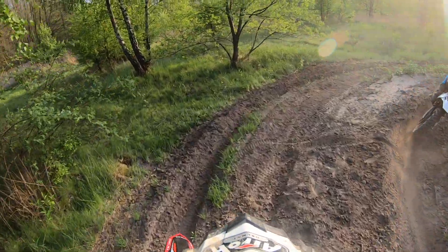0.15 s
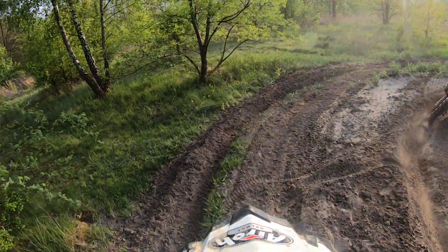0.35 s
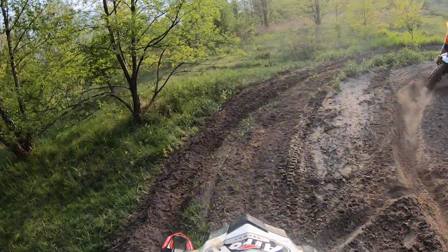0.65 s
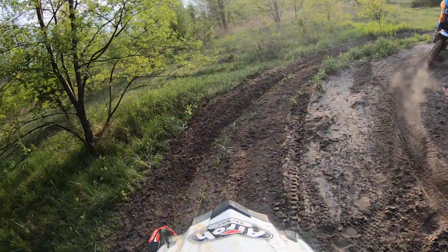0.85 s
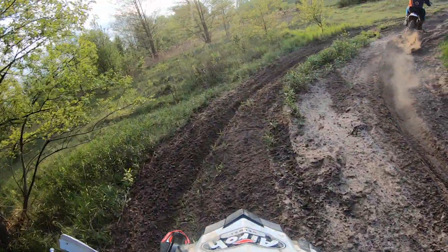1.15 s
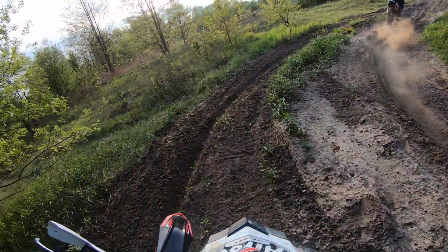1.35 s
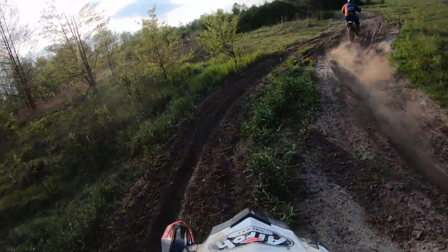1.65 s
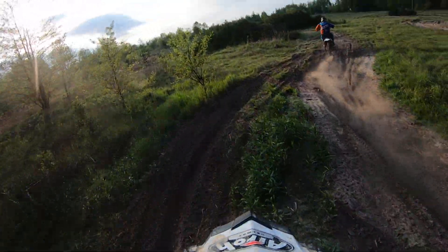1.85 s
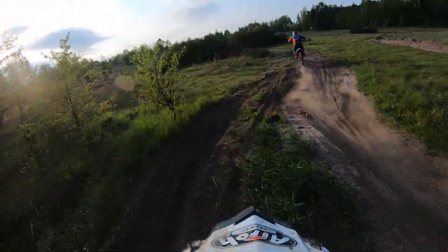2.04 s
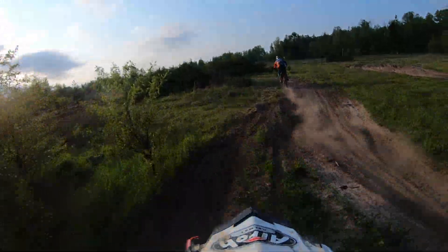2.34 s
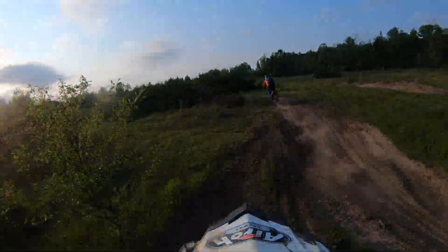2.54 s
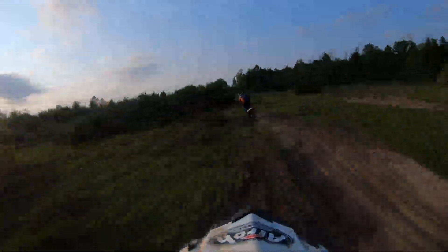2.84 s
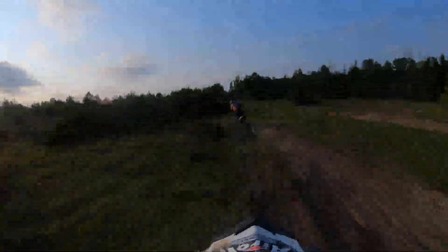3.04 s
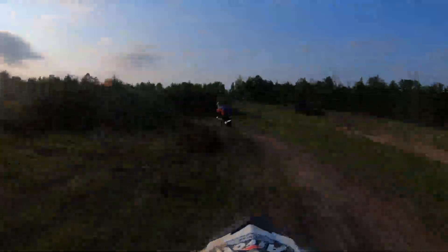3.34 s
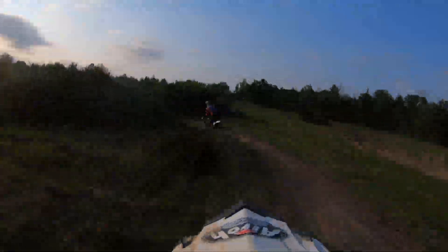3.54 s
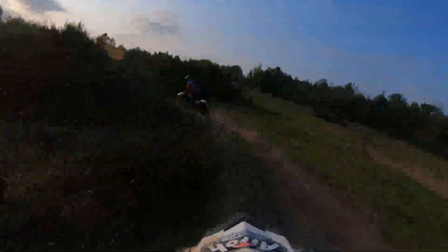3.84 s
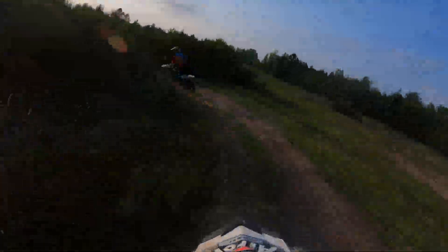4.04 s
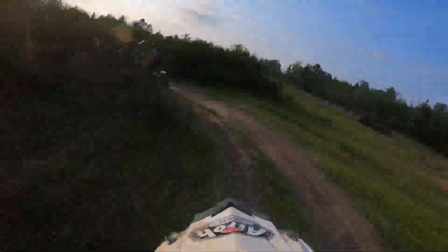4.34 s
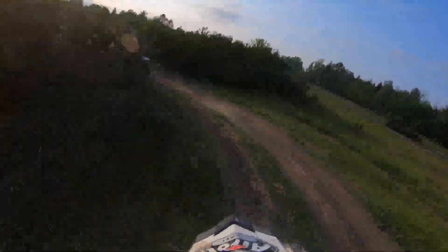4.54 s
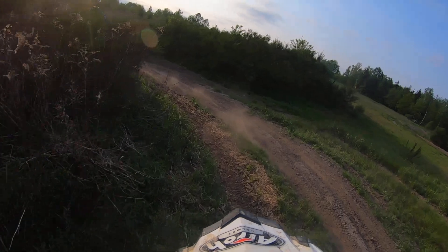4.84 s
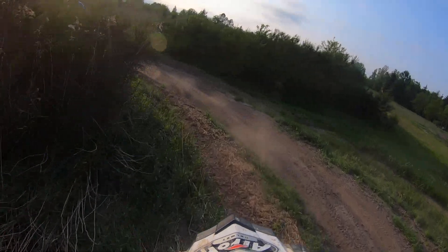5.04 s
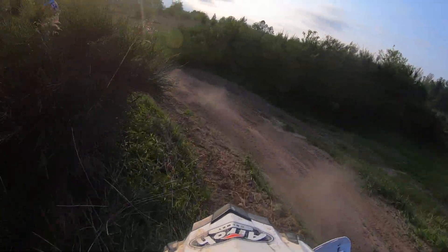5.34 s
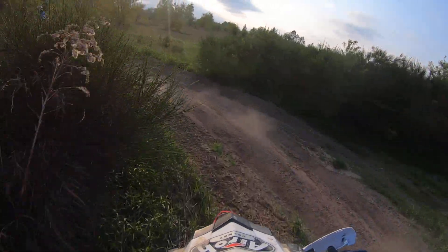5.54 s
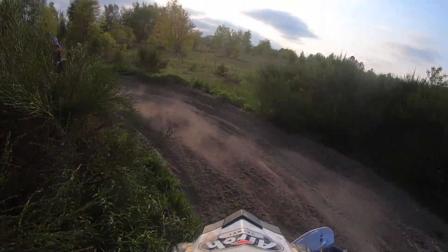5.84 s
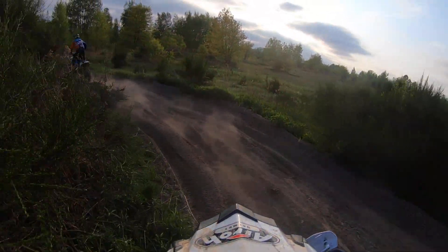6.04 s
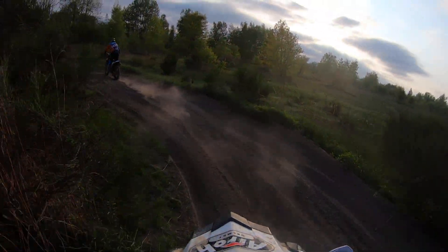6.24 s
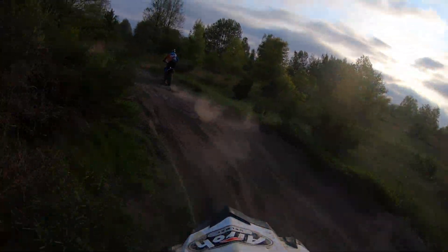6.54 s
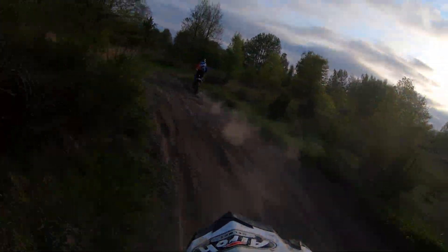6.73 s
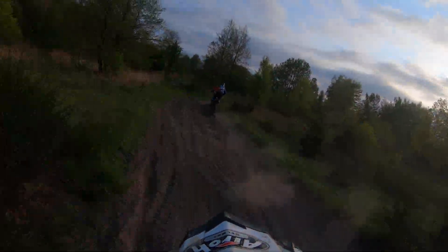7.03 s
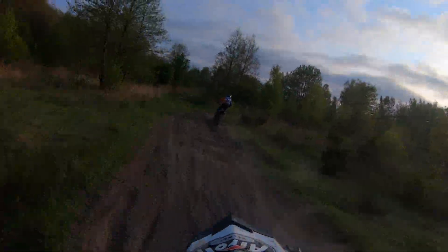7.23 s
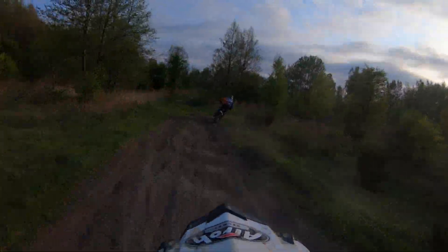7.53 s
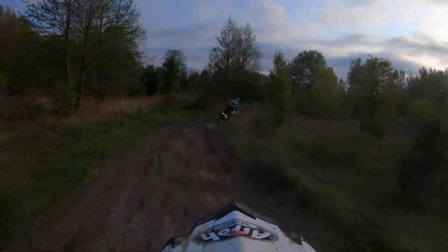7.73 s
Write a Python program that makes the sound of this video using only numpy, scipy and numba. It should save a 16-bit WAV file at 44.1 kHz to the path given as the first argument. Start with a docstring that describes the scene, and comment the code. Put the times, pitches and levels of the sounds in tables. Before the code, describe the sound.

Onboard off-road motorcycle blares in uneven throttle pulls behind another thumping bike, goes quiet with knocks and rattling stones, then buzzes raggedly onward.

```python
"""Two-stroke enduro on dirt

Heard at the rider's helmet: engine firings ring airbox and pipe in loud spells, with a quiet stretch midway.
A bike ahead thumps and cracks through its silencer early on; pops ring in the rider's own pipe.
Modal knocks sound the chassis; stones, swishes and a grainy tyre hiss are coloured noise.
Behind lie a one-band chain whirr and wind: lumpy rumble, rush and gusts.
"""
import sys
import numpy as np
from scipy import signal
from scipy.io import wavfile
from scipy.ndimage import uniform_filter1d
from numba import njit

SR = 44100
rng = np.random.default_rng(int(sys.argv[2]) if len(sys.argv) > 2 else 0)


def persist_wave(psi):
    """Save psi, clipped to +-1, as 16-bit WAV."""
    counts = np.round(np.clip(psi, -1, 1) * 32767).astype(np.int16)
    wavfile.write(sys.argv[1], SR, np.atleast_2d(counts).T)


N = 347508

# engine speed: t/s, firing rate/Hz
SPEED = [(0, 38), (.35, 36.5), (.42, 46), (.53, 50), (.6, 43), (.68, 37.5), (.78, 40.5), (.92, 47.3),
         (.97, 55.5), (1.04, 63.7), (1.2, 66), (1.27, 63.8), (1.35, 56.5), (1.41, 61.8), (1.46, 42),
         (1.68, 41.5), (1.78, 35.5), (1.88, 40), (1.95, 58), (2.02, 67.5), (2.07, 66.2), (2.14, 62),
         (2.19, 46), (2.24, 43.3), (2.3, 49.3), (2.37, 51.7), (2.44, 61), (2.5, 69.6), (2.55, 71.4),
         (2.65, 57), (2.72, 59.5), (2.78, 55), (2.86, 58.4), (2.92, 52.5), (3.07, 51.1), (3.15, 56),
         (3.22, 54), (3.3, 62.5), (3.38, 53), (3.44, 64), (3.5, 52), (3.56, 46), (4.9, 32.5), (5.27, 32),
         (5.35, 40), (5.5, 37.4), (5.64, 40), (5.87, 33), (5.95, 38), (6.09, 41), (6.28, 38.4),
         (6.34, 39.7), (6.4, 45), (6.47, 42), (6.55, 46.5), (6.63, 43.8), (6.72, 47), (6.91, 45),
         (7.06, 38.6), (7.13, 45.5), (7.22, 39), (7.33, 47.8), (7.42, 41.7), (7.54, 49.5), (7.72, 47),
         (7.82, 52)]
# misfiring by load: boom level/dB, roughness/0-1
ROUGH_BY_LOAD = [(-30, .85), (-20, .48), (-14, .24), (-11.5, .12)]
# ragged stretches: start t/s, end t/s, least roughness/0-1
STUMBLES = [(.42, .66, .5), (2.62, 2.88, .55), (2.88, 3.13, .25), (3.13, 3.46, .5), (6.05, 6.25, .6),
            (5.36, 5.56, .55), (7.2, 7.45, .35)]
# modes, in ratio; the first slides to the pitch and width in SPELLS: f/Hz, width/Hz, level/dB
AIRBOX = [(270, 57, 17.5), (295, 296, -12)]
# modes, in ratio; the first slides to the pitch in SPELLS: f/Hz, width/Hz, level/dB
BARK = [(398.7, 41, -0.48), (482, 46, -1)]
# modes, in ratio; the first slides along RASP_HZ: f/Hz, width/Hz, level/dB
RASP = [(581, 70, -1.5), (676, 170, -10)]
# rasp centre, shifting with gas heat: t/s, f/Hz
RASP_HZ = [(0, 540), (3.4, 548), (5.45, 557), (5.7, 585), (6.3, 546), (6.65, 596), (7.2, 556), (7.8, 622)]
# pipe song mode, slides along PIPE_HZ: f/Hz, width/Hz, level/dB
PIPE = [(847, 60, 0)]
# pipe song centre: t/s, f/Hz
PIPE_HZ = [(2.85, 816), (3.17, 877), (3.42, 830), (5.4, 781), (7.8, 787)]
# putter mode: f/Hz, width/Hz, level/dB
PUTTER = [(167.6, 50, 0)]
# drone harmonics: multiple of firing rate, relative level/dB
ORDERS_DB = [(1, -14.5), (2, 8.5), (3, -12.5)]
# spectrum of clatter and knock rattle: f/Hz, relative density/dB per Hz
CLATTER_COLOUR = [(300, 19), (750, 10), (1350, 3.5), (2100, -2.5), (3200, -9.5), (5000, -11.5),
                  (7500, -27.5), (12000, -48)]
WAVER_TURNS, WAVER_RATE_HZ = .075, 9  # at roughness 1
AIRBOX_WANDER_RATIO, AIRBOX_WANDER_RATE_HZ = .02, 8  # small random wander of the boom's pitch


def engine():
    """Each firing rings airbox and pipe; ragged running scatters firings and adds turbulent gas."""
    speed_hz, = in_time(SPEED)
    airbox_hz, airbox_width_hz, bark_hz, *gains = voicing()
    boom_gain, bark_gain, rasp_gain, song_gain, clatter_gain, putter_gain, drone_gain = gains

    rough = np.interp(20 * np.log10(boom_gain), *np.transpose(ROUGH_BY_LOAD))
    t = np.arange(N) / SR
    for start, end, least in STUMBLES:
        rough = np.maximum(rough, least * (t > start) * (t < end))

    # crank runs ahead and lags when ragged
    turns = np.cumsum(speed_hz) / SR + WAVER_TURNS * rough * drift(WAVER_RATE_HZ)
    clicks = firings(turns, rough, spread_db=5.0, jitter_s=.0006)
    puffs = fade(clicks, t60_s=.016) * rng.standard_normal(N)
    low_drive = clicks + .06 * rough ** 2 * puffs
    high_drive = clicks + .11 * rough * puffs

    wander = 1 + AIRBOX_WANDER_RATIO * drift(AIRBOX_WANDER_RATE_HZ)
    airbox_tuning = wander * airbox_hz / AIRBOX[0][0]
    airbox_damping = airbox_width_hz / AIRBOX[0][1]
    rasp_tuning = in_time(RASP_HZ)[0] / RASP[0][0]
    song_tuning = in_time(PIPE_HZ)[0] / PIPE[0][0]

    boom = boom_gain * even(resonate(low_drive, AIRBOX, airbox_tuning, airbox_damping))
    putter = putter_gain * even(resonate(low_drive, PUTTER))
    bark = bark_gain * even(resonate(high_drive, BARK, bark_hz / BARK[0][0]))
    rasp = rasp_gain * even(resonate(high_drive, RASP, rasp_tuning))
    song = song_gain * even(resonate(clicks + .3 * puffs, PIPE, song_tuning))
    # low orders are nearly pure tones
    drone = drone_gain * sum(from_db(db) * np.sin(2 * np.pi * k * turns) for k, db in ORDERS_DB)
    ticks = even(fade(clicks, t60_s=.016))
    clatter = clatter_gain * ticks * coloured_noise(CLATTER_COLOUR, patchy_db=1.0, patchy_rate_hz=25)
    return boom + putter + bark + rasp + song + drone + clatter, clicks


# engine spells: throttle pulls, plus two quiet shut-throttle putters at 3.471 and 4.9 s;
# start t/s, end t/s, airbox f/Hz, airbox width/Hz, bark f/Hz,
# then level/dB of boom, bark, rasp, pipe song, clatter, putter, drone
SPELLS = [(0.395, .64, 242, 60, 291.5, -12.5, -22, -25, -55, -57, -36, -35),
          (0.637, 0.87, 270, 72.4, 302, -19, -20.5, -27, -65, -58, -34, -44),
          (0.873, 1.014, 254, 65.8, 348.6, -12, -16.5, -25, -65, -45, -19.5, -23),
          (0.97, 1.277, 252, 56.8, 382, -10.5, -21, -28, -65, -50, -22.5, -27.5),
          (1.254, 1.398, 241, 62.2, 387, -15, -15, -29.5, -58, -48, -40, -30),
          (1.398, 1.56, 249, 69.1, 422, -18, -21.5, -31, -58, -36, -20, -30),
          (1.539, 1.686, 349, 82.3, 447, -18, -19.5, -35, -61, -36, -36, -29),
          (1.68, 1.905, 287, 75, 394, -22.5, -26.5, -43, -53, -37, -35, -39),
          (1.897, 2.172, 256, 61.6, 373, -12, -21, -30.5, -53, -36.5, -30, -30),
          (2.195, 2.42, 240, 43.5, 285, -13, -20, -28, -48, -62, -38, -31),
          (2.373, 2.613, 268.3, 50.6, 408, -7.5, -29, -35.5, -59, -70, -31.5, -31.5),
          (2.594, 2.883, 245, 61.6, 389.4, -10.5, -21, -32, -36, -53, -19.5, -39.5),
          (2.869, 3.142, 283.4, 69.4, 382, -10, -24, -36, -30.5, -55, -23.5, -29.5),
          (3.117, 3.456, 253.7, 73.4, 383, -10, -22.5, -29, -32, -52, -19.5, -33),
          (3.471, 3.9, 251.6, 59.7, 384, -31.5, -45, -61, -63.5, -53, -37.5, -48),
          (4.9, 5.343, 235, 59, 393, -39, -40.5, -45, -49, -41, -27, -46),
          (5.355, 5.596, 243, 48, 395, -18, -31, -33, -35.5, -31.5, -25, -49),
          (5.572, 5.711, 259, 40, 420, -12, -39, -28.5, -52, -39, -36, -58),
          (5.799, 6.098, 269.6, 49.3, 392, -22, -41, -40.5, -54, -29.5, -25.5, -39),
          (6.07, 6.312, 264, 49.2, 423, -17.5, -35, -30, -43, -37, -28.5, -32),
          (6.257, 6.699, 270.5, 34.5, 430, -11.5, -33, -27, -62, -42.5, -36, -37),
          (6.694, 6.962, 291, 39.8, 373, -13, -37.5, -35.5, -61, -64, -33, -52),
          (6.943, 7.186, 255.4, 38, 377, -11.5, -35, -34, -55, -63, -31, -43),
          (7.175, 7.48, 268, 50, 367, -14, -27, -31.5, -61.5, -53, -26, -31.5),
          (7.402, 7.665, 247.6, 38.7, 420, -10, -28.5, -28, -52.5, -50, -21, -36),
          (7.67, 7.883, 257.6, 47, 414, -15, -28, -28.5, -33.5, -41, -23.5, -34)]
# between spells: level/dB of boom, bark, rasp, pipe song, clatter, putter, drone
BETWEEN_SPELLS = (-54, -63, -48, -58.5, -40.5, -38, -45)
SPELL_RISE_S, SPELL_FALL_S = 0.053, 0.04


def voicing():
    """Airbox pitch and width, bark pitch, then voice gains: spells over a resting level."""
    starts, ends, airbox_hz, airbox_width_hz, bark_hz, *levels_db = np.transpose(SPELLS)
    resting = 1 - swells(starts, ends, np.zeros(len(starts)), SPELL_RISE_S, SPELL_FALL_S)
    gains = []
    for spell_db, resting_db in zip(levels_db, BETWEEN_SPELLS):
        spell = swells(starts, ends, spell_db, SPELL_RISE_S, SPELL_FALL_S)
        gains.append(spell + resting * from_db(resting_db))
    middles = (starts + ends) / 2
    return in_time(np.column_stack([middles, airbox_hz, airbox_width_hz, bark_hz])) + gains


# pipe pops: t/s, level/dB (the sum is scaled to peak at the strongest)
POPS = [(5.551, -15), (6.110, -9.5), (6.156, -12.5), (6.314, -14.5)]
# pop modes: f/Hz, width/Hz, relative level/dB
POP_RING = [(564, 240, 0), (750, 110, 0)]


def pops():
    """Single impulses ring two pipe resonances."""
    s, db = np.transpose(POPS)
    clicks = np.zeros(N)
    clicks[(s * SR).astype(int)] = from_db(db)
    ring = resonate(clicks, POP_RING)
    return ring * clicks.max() / np.abs(ring).max()


# bike ahead speed: t/s, firing rate/Hz
LEAD_SPEED = [(0, 22), (.15, 26.8), (.31, 30.6), (.39, 23), (.48, 25.6), (.7, 24.9), (.88, 27.1),
              (1.15, 39), (1.45, 31), (1.75, 41), (2.3, 38)]
# its pulls; thump weaker after 0.95 s, cracks strongest from 0.35 to 0.94 s:
# open t/s, close t/s, thump level/dB, crack level/dB
LEAD_PULLS = [ (-.1, 0.41, -19, -35), (0.346, .68, -17.5, -27), (.66, 0.94, -17.5, -26.5),
              (.95, 1.315, -23.5, -35), (1.43, 1.987, -27, -32)]
# its silencer modes: f/Hz, width/Hz, relative level/dB
SILENCER = [(147.4, 89, 4.5), (320, 180, -14)]
# its crack spectrum: f/Hz, relative density/dB per Hz
LEAD_COLOUR = [(400, 25.5), (1300, 15), (2000, 10), (2600, -4), (3300, 8), (5000, -9.5), (7500, -32.5),
               (12000, -12.5)]
LEAD_OPEN_S, LEAD_CLOSE_S = 0.036, 0.088
LEAD_ECHO_S, LEAD_ECHO_DB = 0.00652, -7  # one return along the pipe


def bike_ahead():
    """Each firing thumps through the silencer, with a sharp crack of gas."""
    speed_hz, = in_time(LEAD_SPEED)
    opens, closes, *levels_db = np.transpose(LEAD_PULLS)
    thump_gain, crack_gain = (swells(opens, closes, db, LEAD_OPEN_S, LEAD_CLOSE_S) for db in levels_db)
    turns = .85 + np.cumsum(speed_hz) / SR
    clicks = firings(turns, np.ones(N), spread_db=.6, jitter_s=.0002)
    samples = np.arange(N)
    echo = from_db(LEAD_ECHO_DB) * np.interp(samples - LEAD_ECHO_S * SR, samples, clicks)
    thump = even(resonate(clicks + echo, SILENCER))
    burst = even(fade(clicks, t60_s=.013) + .025 * fade(clicks, t60_s=.09))
    gas = coloured_noise(LEAD_COLOUR, patchy_db=.5, patchy_rate_hz=25)
    return thump_gain * thump + crack_gain * burst * gas


# bumps: t/s, thud drive level/dB, rattle drive re thud/dB
KNOCKS = [(3.92, -27, -24), (4.087, -29, -3), (4.835, -14, -14), (4.86, -20, -6), (4.944, -23, -8),
          (5.007, -15.5, -12), (5.062, -16, -8), (5.159, -20, -7), (5.167, -21.5, -3)]
# chassis and fender modes: f/Hz, relative level/dB (scattered per blow), t60/s
CHASSIS = [(86, 3.5, 0.048), (161, -3, 0.12), (274, 13.5, 0.015), (530, -4, 0.025), (715, -9.5, 0.092),
           (1350, -13, .02)]
CONTACT_HZ = 800  # rubber and plastic soften blows


def knocks():
    """Bumps ring damped chassis modes and shake loose parts into a short rattle."""
    s, db, rattle_db = np.transpose(KNOCKS)
    at = (s * SR).astype(int)
    hits, shakes, ringing = np.zeros(N), np.zeros(N), 0
    shakes[at] = from_db(db + rattle_db)
    for hz, mode_db, t60_s in CHASSIS:
        hits[at] = from_db(db + mode_db + rng.normal(0, 2.5, len(at)))
        r, w = from_db(-60 / (t60_s * SR)), 2 * np.pi * hz / SR
        ringing = ringing + signal.lfilter([0, np.sin(w)], [1, -2 * r * np.cos(w), r * r], hits + 1e-18)
    thud = signal.sosfilt(signal.butter(2, CONTACT_HZ, fs=SR, output="sos"), ringing)
    loose = coloured_noise(CLATTER_COLOUR, patchy_db=3, patchy_rate_hz=60)
    return thud + fade(shakes, t60_s=.05) * loose


# loose stones: start t/s, end t/s, level/dB
GRAVEL = [(3.5, 3.954, -46), (3.987, 4.71, -46), (4.715, 4.8, -30), (4.767, 4.986, -28.5),
          (5.023, 5.07, -32), (5.287, 5.39, -38), (7.712, 7.878, -33.5)]
# stone spectrum: f/Hz, relative density/dB per Hz
GRAVEL_COLOUR = [(500, 11.5), (1100, 10), (2000, 0.5), (2800, -6.5), (6000, -23.5)]
STONES_PER_S = 300


def gravel():
    """Stones of very unequal size crackle against the fenders: random strikes gate noise."""
    sizes = from_db(5 * np.minimum(rng.exponential(1, N), 2.5))
    stones = (rng.random(N) < STONES_PER_S / SR) * sizes
    strikes = even(fade(stones, t60_s=.018))
    noise = coloured_noise(GRAVEL_COLOUR, patchy_db=2.0, patchy_rate_hz=50)
    return swells(*np.transpose(GRAVEL), rise_s=0.06, fall_s=0.06) * strikes * noise


# sand and grass swishes: start t/s, end t/s, level/dB (before flicker)
SPRAYS = [(0.024, 0.055, -48.5), (4.734, 5.362, -51.5), (5.894, 6.09, -51.5)]
# swish spectrum: f/Hz, relative density/dB per Hz
SPRAY_COLOUR = [(2500, -7.5), (5200, 15.5), (7000, -7.5), (9000, -28)]


def spray():
    """Sand and grass sweep along the bike in bright, flickering noise."""
    gain = swells(*np.transpose(SPRAYS), rise_s=0.014, fall_s=0.084)
    flicker = from_db(5.0 * drift(90))
    return gain * flicker * coloured_noise(SPRAY_COLOUR, patchy_db=4.0, patchy_rate_hz=45)


# tyre hiss: t/s, level/dB (before GRIT_GAIN_DB)
GROUND = [(0.0, -47), (0.32, -53), (0.39, -45.5), (1.37, -50), (1.97, -49), (2.54, -55), (3.45, -53),
          (3.58, -63), (4.5, -56.5), (4.93, -52), (5.04, -61), (5.58, -43.5), (5.78, -50), (5.95, -49.5),
          (6.52, -55), (7.8, -55.5)]
# hiss spectrum: f/Hz, relative density/dB per Hz
GRIT_COLOUR = [(800, -9), (2000, 6.5), (3100, 6), (4200, -2), (5400, -3), (7200, -5), (8800, -22),
               (10500, -5.5), (13000, -3)]
GRIT_GAIN_DB = 7


def ground():
    """Dirt and grass hiss, with single grains ticking on the plastics as short swells."""
    hiss_db, = in_time(GROUND)
    grains = (rng.random(N) < 90 / SR) * rng.uniform(.3, 1.5, N)  # 90 per s
    texture = rms_one(1 + 0.29 * fade(grains, t60_s=0.026))
    noise = coloured_noise(GRIT_COLOUR, patchy_db=2.0, patchy_rate_hz=33)
    return from_db(hiss_db + GRIT_GAIN_DB) * texture * noise


# chain mode: f/Hz, width/Hz, level/dB (then normalised)
CHAIN = [(1403, 470, 0)]
# chain whirr: t/s, level/dB
CHAIN_LEVEL = [(.3, -37.5), (2.5, -47.5), (3.2, -40.5), (3.7, -70.5), (5.2, -48.5), (6.2, -41), (6.9, -48),
               (7.4, -45.5)]


def chain():
    """The drive chain whirrs: noise through one broad resonance."""
    level_db, = in_time(CHAIN_LEVEL)
    return from_db(level_db) * rms_one(resonate(rng.standard_normal(N), CHAIN))


# helmet rumble: t/s, level/dB (before RUMBLE_GAIN_DB)
RUMBLE = [(0.0, -31), (0.39, -29), (0.52, -38), (0.76, -21), (1.14, -36.5), (1.46, -29), (1.88, -26.5),
          (1.9, -28.5), (3.0, -40), (3.1, -29.5), (3.54, -32), (3.56, -25.5), (3.65, -31.5), (3.82, -31.5),
          (3.91, -28.5), (4.04, -38), (4.92, -26), (5.12, -33), (5.16, -24.5), (5.2, -38), (5.46, -28),
          (5.49, -30), (5.68, -34), (5.82, -23), (5.86, -28), (6.23, -23.5), (6.3, -25), (7.11, -34),
          (7.19, -24), (7.61, -30.5), (7.63, -20.5), (7.85, -26.5)]
# rumble spectrum: f/Hz, relative density/dB per Hz
RUMBLE_COLOUR = [(20, -23), (35, -4.5), (55, -3.5), (90, -3.5), (170, -7.5), (280, -11.5), (450, -18),
                 (800, -27), (1600, -45.5)]
# helmet gusts: start t/s, end t/s, level/dB
GUSTS = [(0.487, 0.625, -24.5), (1.6, 1.96, -25.5), (4.765, 4.97, -21.5), (5.263, 5.375, -25),
         (6.835, 6.91, -27), (7, 7.085, -26.5), (7.7, 7.883, -25)]
# rush and gust spectrum: f/Hz, relative density/dB per Hz
BUFFET_COLOUR = [(40, -5), (150, 15.5), (350, 10), (700, 7), (1000, 7), (1400, -2.5), (2000, -12.5),
                 (2800, -16), (4000, -39.5), (8000, -60.5)]
RUMBLE_GAIN_DB = 6
RUSH_DB, RUSH_DB_PER_OCTAVE = -36, 11  # level at REFERENCE_SPEED_HZ, growth with firing rate
GUST_RISE_S, GUST_FALL_S = 0.067, 0.028


def wind(clicks):
    """Turbulent air: lumpy rumble, gusts, and a rush that grows with engine speed and throbs with firings."""
    rumble_db, = in_time(RUMBLE)
    steady = with_speed(RUSH_DB, RUSH_DB_PER_OCTAVE)
    gusts = swells(*np.transpose(GUSTS), GUST_RISE_S, GUST_FALL_S)
    rush_gain = np.hypot(steady, gusts)
    lumps = even(coloured_noise(RUMBLE_COLOUR, patchy_db=3.0, patchy_rate_hz=49))
    rumble = from_db(rumble_db + RUMBLE_GAIN_DB) * lumps
    flutter = even(from_db(2.4 * drift(76)) * (1 + .5 * fade(clicks, t60_s=0.0033)))
    return rumble + rush_gain * flutter * coloured_noise(BUFFET_COLOUR, patchy_db=1.5, patchy_rate_hz=20)


REFERENCE_SPEED_HZ = 50  # firing rate


def with_speed(db, db_per_octave):
    """Gain that grows with engine speed."""
    speed_hz, = in_time(SPEED)
    return from_db(db + db_per_octave * np.log2(speed_hz / REFERENCE_SPEED_HZ))


def firings(turns, rough, spread_db, jitter_s):
    """One click per whole turn; roughness scatters strength and timing."""
    chance = rng.standard_normal((600, 2))
    at = np.flatnonzero(np.diff(np.floor(turns)) > 0)
    strength, lateness = chance[:len(at)].T * rough[at]
    late_at = at + (lateness * jitter_s * SR).astype(int)
    clicks = np.zeros(N)
    clicks[np.clip(late_at, 0, N - 1)] = from_db(spread_db * np.tanh(strength))
    return clicks


def resonate(x, modes, tuning=1, damping=1):
    """Parallel double-pole resonances; tuning scales centres, damping scales widths."""
    out, seconds = 0, np.cumsum(tuning * np.ones(N)) / SR
    for k, (hz, width_hz, db) in enumerate(modes):
        keep = np.exp(-np.pi * width_hz * damping * np.ones(N) / SR)
        turn = np.exp(2j * np.pi * hz * seconds)
        # shift to 0 Hz, low-pass, shift back
        ring = (build_up(x * turn.conj() + 1e-18, keep) * turn).real
        out = out + (-1) ** k * from_db(db) * ring
    return out


@njit
def build_up(x, keep):
    """Two cascaded one-pole low-passes with per-sample memory."""
    out, first, second = np.zeros_like(x), 0j, 0j
    for i in range(len(x)):
        first = x[i] + keep[i] * (first - x[i])
        second = first + keep[i] * (second - first)
        out[i] = second
    return out


def fade(clicks, t60_s):
    """Each click starts an envelope with a 0.5 ms rise constant and exponential decay."""
    rise = np.exp(-1 / (.0005 * SR))
    decay = from_db(-60 / (t60_s * SR))
    return signal.lfilter([1 - rise], np.convolve([1, -rise], [1, -decay]), clicks + 1e-18)


def coloured_noise(colour, patchy_db, patchy_rate_hz):
    """Half-octave noise bands, each flickering on its own; rms 1."""
    hz, db = np.transpose(colour)
    edges = 20 * 2 ** np.arange(0, 9.6, .5)
    white, out = rng.standard_normal((2, N)), 0
    for k, (low, high) in enumerate(zip(edges, edges[1:])):
        flicker_db = patchy_db * drift(patchy_rate_hz)
        if high > hz[0] and low < hz[-1]:
            bandpass = signal.butter(2, [low, high], "band", fs=SR, output="sos")
            band = signal.sosfilt(bandpass, white[k % 2])  # neighbours use separate noise
            band_db = np.interp(np.log(low * high) / 2, np.log(hz), db)
            out = out + band * from_db(band_db + flicker_db)
    return rms_one(out)


def swells(starts, ends, levels_db, rise_s, fall_s):
    """Gain of bursts: linear rise, hold, exponential fall; the strongest prevails."""
    t, gain = np.arange(0, N, 40) / SR, 0
    for start, end, db in zip(starts, ends, levels_db):
        rise = np.clip((t - start) / rise_s, 0, 1)
        fall = np.exp(-np.maximum(t - end, 0) / fall_s)
        gain = np.maximum(gain, from_db(db) * rise * fall)
    return np.interp(np.arange(N) / SR, t, gain)


def drift(rate_hz):
    """Slow random wander of unit rms, computed every 40 samples."""
    r = np.exp(-80 * np.pi * rate_hz / SR)
    noise = rng.standard_normal(N // 40 + 2002)
    slow = signal.lfilter([1], [1, -2 * r, r * r], noise)[2000:]  # drop the settling
    return np.interp(np.arange(N) / 40, np.arange(len(slow)), rms_one(slow))


def even(x):
    """Level to about unit power over a few firings, keeping each one's shape."""
    power = uniform_filter1d(uniform_filter1d(x ** 2, size=2400), size=1900)
    return x / np.sqrt(np.abs(power) + 1e-4 * np.mean(power))


def in_time(rows):
    """Each column of a curve at every sample."""
    s, *columns = np.transpose(rows)
    return [np.interp(np.arange(N) / SR, s, c) for c in columns]


def rms_one(x):
    """Scale to unit rms."""
    return x / np.sqrt(np.mean(x ** 2) + 1e-20)


def from_db(db):
    """Decibels to gain."""
    return 10 ** (np.asarray(db) / 20)


def scene():
    """Sum of all sources at the helmet, one channel."""
    motor, clicks = engine()
    bikes = motor + pops() + bike_ahead()
    track = ground() + gravel() + spray() + knocks()
    return (bikes + track + chain() + wind(clicks))[None]


MIC_TOP_HZ, CUTOFF_HZ = 7570, 15100


def record(dry):
    """Soft-limit peaks, as a covered microphone dull the top, then cut steeply."""
    ceiling = 0.79
    rounded = dry / (1 + (dry / ceiling) ** 4) ** (1 / 4)
    muffled = signal.sosfilt(signal.butter(4, MIC_TOP_HZ, fs=SR, output="sos"), rounded)
    return signal.sosfilt(signal.cheby2(12, 70, CUTOFF_HZ, fs=SR, output="sos"), muffled)


dry = scene()
out = record(dry)
persist_wave(out)
```